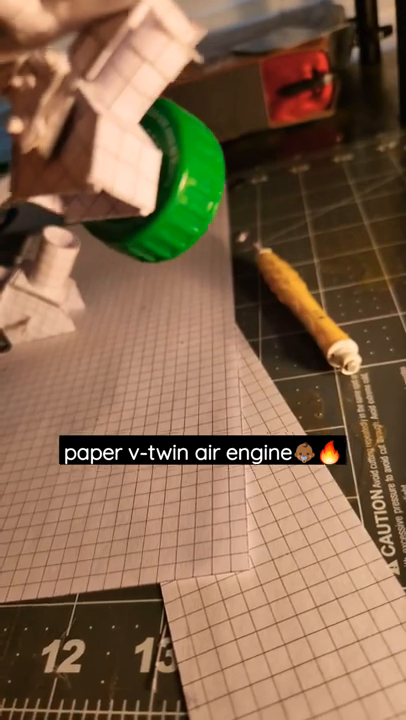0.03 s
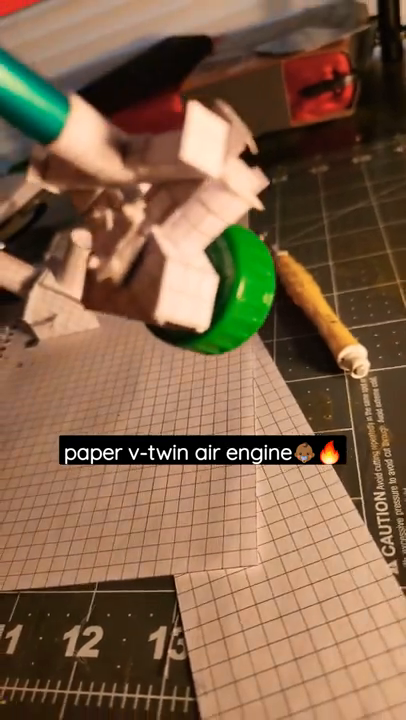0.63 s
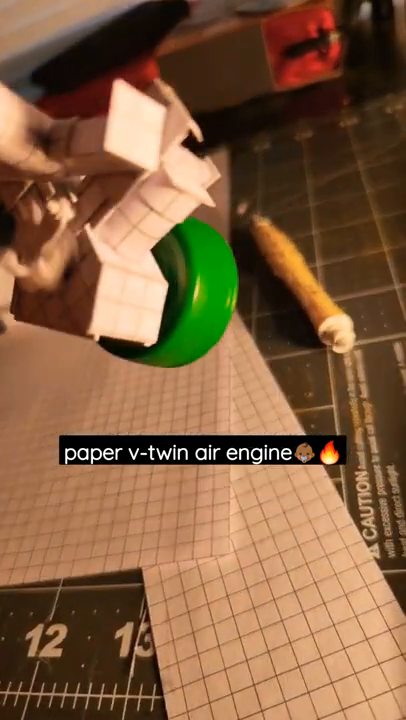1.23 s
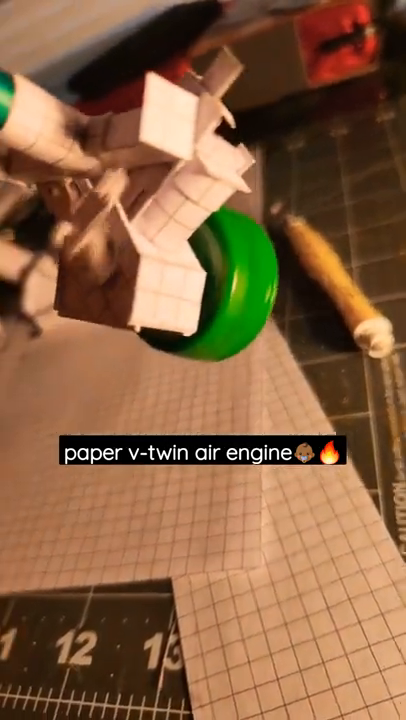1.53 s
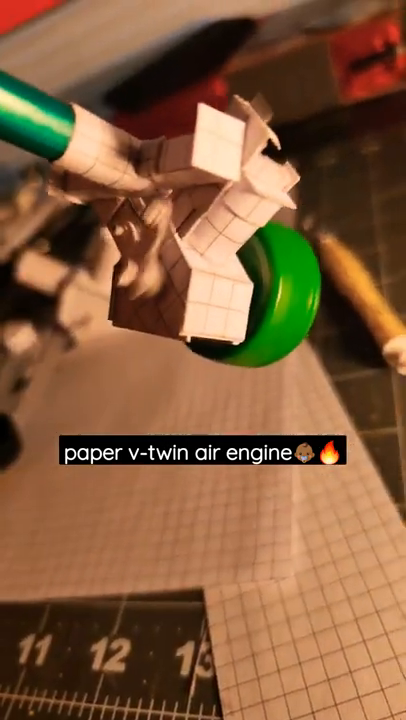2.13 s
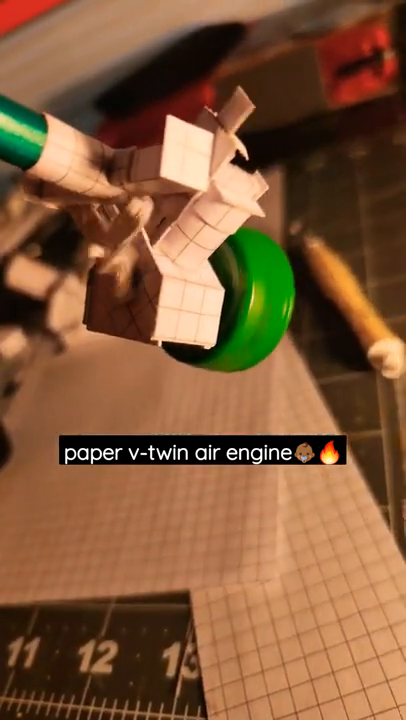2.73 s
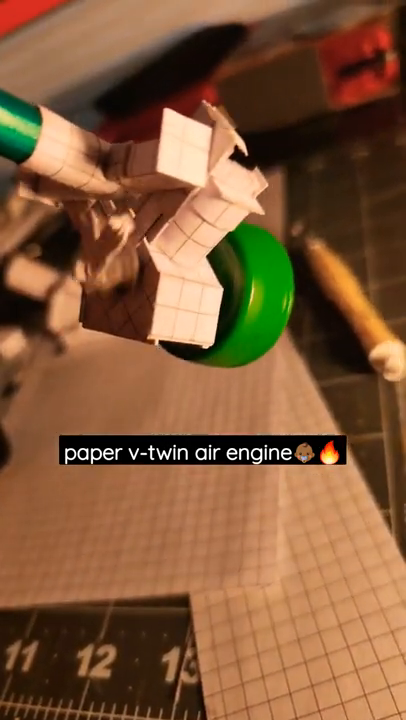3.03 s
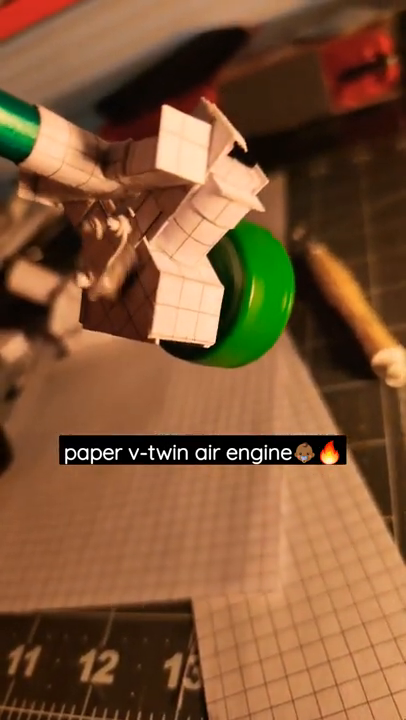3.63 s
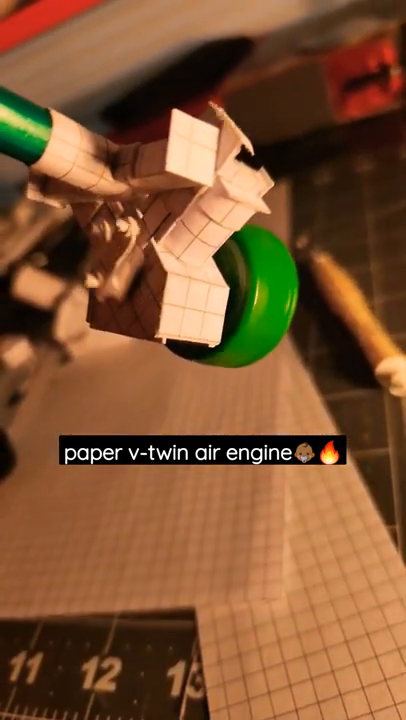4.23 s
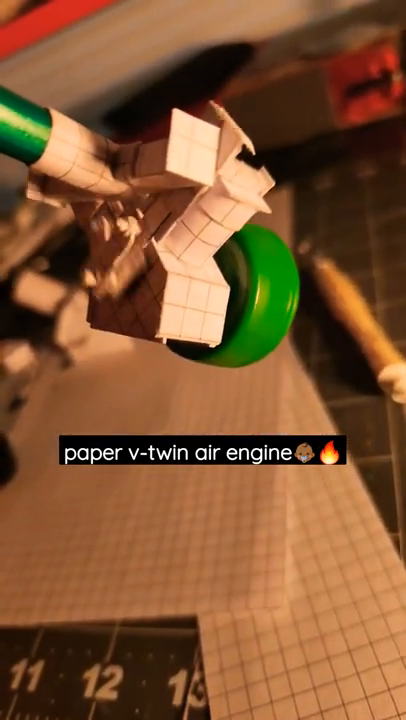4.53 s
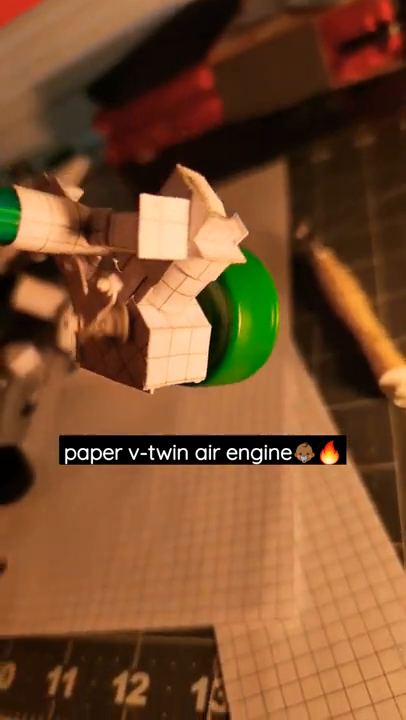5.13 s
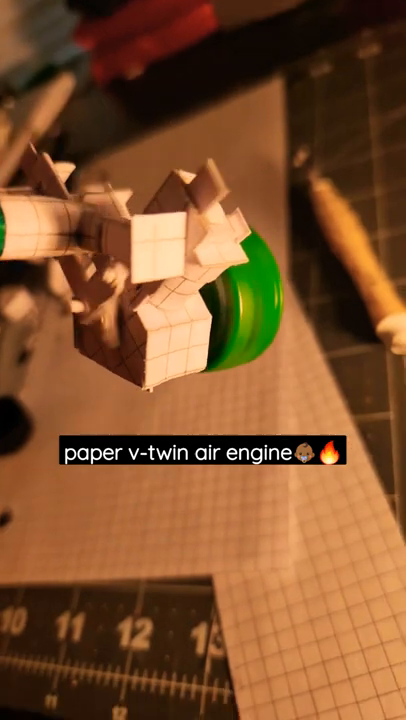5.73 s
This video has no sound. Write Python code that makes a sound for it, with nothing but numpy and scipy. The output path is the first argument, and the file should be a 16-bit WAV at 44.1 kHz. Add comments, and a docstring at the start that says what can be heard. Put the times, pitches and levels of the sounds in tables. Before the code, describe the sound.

After light handling, air hisses through a little paper engine that races with rapid clacks and a whirr, then settles.

```python
"""At a desk, close to a phone: a paper V-twin with a plastic flywheel runs on air from a tube.
The model is handled, the air comes on, the crank spins up to 32 turns/s and settles at 20 as the
pressure sags. Each turn the slack linkage clacks and thuds, the valves chop the escaping air and
the paper pistons scrape. The crank purrs and whirrs; the room rumbles and hums underneath.
Near the end the model is tipped and its treble shifts."""
import sys
import numpy as np
from scipy import signal
from scipy.fft import rfft, irfft, next_fast_len
from scipy.io import wavfile
from scipy.ndimage import uniform_filter1d

SR = 44100
rng = np.random.default_rng(int(sys.argv[2]) if len(sys.argv) > 2 else 0)


def dump_mix(stems):
    """Bounce the given channels to the path in sys.argv[1] as a 16-bit WAV at rate SR."""
    frames = np.atleast_2d(stems).T  # one column per channel
    limited = np.clip(frames, -1, 1)  # hard clip at full scale
    pcm = np.round(limited * 32767).astype(np.int16)
    wavfile.write(sys.argv[1], SR, pcm)


N = 258867
T = np.arange(N) / SR
FFT_SIZE = next_fast_len(N + SR)
HZ = np.arange(FFT_SIZE // 2 + 1) * SR / FFT_SIZE + 1e-3
AIR_ON_S = .77

# rod knocks per turn: angle/turns, clack/dB, thud/dB, clack scatter/turns
ROD_KNOCKS = [(0, 8, 2.5, .002), (.37, 5, -9, .008), (.6, -3, -14, .03), (.8, -2, -14, .04)]
# hardest clacks, at dead centre: t/s, level/dB
ROD_SLAMS = [(0.881, -27), (1.0114, -13.5), (1.0779, -17), (1.1292, -7), (1.1741, -12), (1.2127, -6.5),
             (1.249, -5), (1.3499, -8), (1.4114, -11), (1.5357, -13), (1.7215, -10.5), (1.7526, -11.5),
             (1.8153, -12), (1.9425, -14), (2.0392, -15), (2.239, -14.5), (2.273, -11), (2.3418, -9.5),
             (2.377, -11.5), (2.4123, -14), (2.4479, -15.5), (2.4829, -14.5), (2.5192, -17), (2.593, -16),
             (2.6298, -12), (2.7436, -16), (2.7827, -13), (2.8196, -15.5), (2.939, -18), (3.062, -16),
             (3.1044, -16.5), (3.1455, -14), (3.19, -15), (3.276, -15), (3.365, -19), (3.41, -16),
             (3.4558, -20), (3.5464, -18), (3.6893, -16), (3.738, -17), (3.786, -16.5), (3.9354, -18),
             (3.9853, -18), (4.034, -24), (4.0852, -24), (4.185, -18.5), (4.2846, -19.5), (4.3868, -18),
             (4.437, -18), (4.538, -17), (4.6884, -18), (4.789, -20), (4.8885, -18), (4.9396, -19),
             (4.99, -19), (5.1922, -20), (5.2441, -21), (5.2944, -18), (5.4993, -20.5), (5.6513, -20),
             (5.8045, -20)]
# paper crankcase: f/Hz, width/Hz, level/dB
CASE_MODES = [(845, 130, -7), (1066, 28, -2), (1540, 130, -1), (2900, 174, 21), (3170, 160, 11),
              (4070, 250, 7.5), (5500, 370, 6.5), (7200, 320, -15)]
# whole model on its mount: f/Hz, width/Hz, level/dB
MOUNT_MODES = [(87, 30, -9), (305, 7.4, 9.5), (338, 22, 7.5), (395, 39, 1.5), (477.5, 16, 6),
               (509.7, 4.6, -6), (702, 43, 1), (863, 10.4, 2), (1085, 32, 0)]
# valve outflow over a turn: angle/turns, level/dB
VALVE_FLOW = [(.03, 4.5), (.13, 4), (.18, 2.2), (.29, 1.5), (.37, 6), (.46, 3.5), (.6, 5), (.68, 4),
              (.8, 4.5), (.92, 4.5)]
# escaping air: f/Hz, level/dB
JET_SPECTRUM = [(300, -13.5), (620, -18), (800, -12), (1200, -11), (1450, -8.5), (1850, -9.5), (2300, -2.5),
                (2850, 0.5), (3350, 2.5), (3820, -11), (4250, -4.5), (5200, -5.5), (6300, -2.5),
                (6850, -11), (7400, -3.5), (9000, -9.5), (15000, -15.5)]
# a valve cracks open: angle/turns, level/dB
VALVE_PUFFS = [(.115, 4), (.53, 0), (.73, -2), (.9, 0)]
# those puffs: f/Hz, level/dB
PUFF_SPECTRUM = [(1000, -20), (3000, 6.5), (6500, 9.5), (7450, 18), (8600, -16), (15000, -21)]
# paper cylinders: f/Hz, width/Hz, level/dB
BORE_MODES = [(2910, 200, 6.5), (3110, 180, 2), (3250, 74, 4.5), (4090, 350, 4.5), (4290, 210, -10),
              (5480, 350, -12), (7580, 260, -2), (7460, 150, -42)]
# crank unbalance: multiple of turn rate, level/dB
SWAY_ORDERS = [(1, -9), (2, -14), (3, 2.5), (4, -8), (5, -7)]
# crankshaft at speed: multiple of turn rate, level/dB
WHIRR_ORDERS = [(9, -60), (10, -53), (11, -48), (12, -49), (13, -52), (14, -55.5), (15, -54), (16, -52),
                (17, -56), (18, -56), (19, -60), (20, -57), (21, -57.5), (22, -56.5), (28, -58)]
# crankcase hits its mount: t/s, level/dB
CASE_KICKS = [(1.007, -27), (1.128, -34), (1.41, -22), (1.441, -20)]
# hollow ring of kicks and piston drag: f/Hz, width/Hz, level/dB
HOLLOW_MODES = [(733, 36, -1), (870, 97, 6), (1060, 70, 5.5), (1420, 160, 4.5), (1620, 120, -29)]
# model bumped: t/s, level/dB, decay/s, relative case ring/dB
HANDLING_BUMPS = [(0.27, -41.5, 0.003, -30), (0.304, -55.5, 0.0089, -1), (.339, -60, .007, -4),
                  (0.356, -55.5, 0.0068, -15), (.712, -62, .012, -20), (0.737, -42.5, 0.011, -14),
                  (0.759, -40.5, 0.0048, -20), (.772, -42, 0.004, -11)]
# paper snaps: t/s, level/dB
PAPER_SNAPS = [(.269, -43), (.304, -49), (.7345, -50), (0.7458, -36), (0.756, -34)]
# model tipped: t/s, share of tipped response
TIP_SHARE = [(4.7, 0), (5.05, 0.7)]
# jets swung towards the far port: f/Hz, gain/dB
TIP_RESPONSE = [(1300, 2), (1700, 4), (2300, 4), (2900, -6), (3400, -9.5), (4100, -1.5), (4600, 5.5),
                (5100, 2.5), (6000, -4), (9500, 1), (14000, -1.5)]
# far microphone port, shaded by the phone: f/Hz, gain/dB
FAR_PORT_RESPONSE = [(100, -6.5), (380, 0), (700, -7), (1200, -5.5), (1500, -4), (2700, -6.5),
                     (3300, -10.5), (4200, -8), (5800, -10), (7400, -10), (8400, -5), (9500, -11),
                     (12000, -1), (15000, -8)]
# room rumble: f/Hz, level/dB
ROOM_SPECTRUM = [(15, -57), (25, -31), (56, 1), (88, -9), (103, -3), (125, -4.5), (146, -21), (181, -25.5),
                 (202, -22.5), (240, -15), (330, -15), (450, -34), (655, -33.5), (952, -44), (1960, -49),
                 (15000, -106)]
# steady background hiss: f/Hz, width/Hz, level/dB
HISS_BANDS = [(1900, 760, 16), (4960, 700, 2), (7360, 570, 0)]


def crank(spin_up_s=.36, fast_rps=33.94, steady_rps=19.773, slowing_s=(.97, 4.292)):
    """Speed and angle: the flywheel spins up against its inertia, then slows to a steady run."""
    spun_up = 1 - np.exp(-(np.maximum(T - AIR_ON_S, 0) / spin_up_s) ** 2)
    slowed = .5 - .5 * np.cos(np.pi * np.interp(T, slowing_s, [0, 1]))
    speed_rps = spun_up * (fast_rps + slowed * (steady_rps - fast_rps))
    turns = np.cumsum(speed_rps) / SR
    # slams fall on whole turns
    slam_s = np.transpose(ROD_SLAMS)[0]
    at_slam = np.interp(slam_s, T, turns)
    whole = np.cumsum(np.round(np.diff(at_slam, prepend=at_slam[0])))
    return speed_rps, turns - np.interp(T, slam_s, at_slam - whole) + 1


def supply_db(steady_db, surge_db, power, peak_s=1.23, sag_s=1.626):
    """Air-driven level: rises as the supply opens, sags with the pressure."""
    opening = np.clip((T - AIR_ON_S) / (peak_s - AIR_ON_S), 1e-5, 1)
    surge = np.exp(-np.maximum(T - peak_s, 0) / sag_s)
    return steady_db + surge_db * surge + power * 20 * np.log10(opening)


def linkage(speed_rps, turns, force_db, full_clack_rps=18, rattle_db=5, thud_lead_s=.0012):
    """Slack rods knock at set crank angles: a clack in the paper, a thud in the mount."""
    at_turns, clack_db, thud_db, slack_turns = np.transpose(ROD_KNOCKS)
    count = int(turns[-1]) + 1
    jitter, clack_spread, thud_spread = rng.standard_normal((count, 3, len(at_turns))).swapaxes(0, 1)
    knock_turns = np.arange(count)[:, None] + at_turns
    clack_s = np.interp(knock_turns + slack_turns * jitter, turns, T, left=0, right=N / SR)
    clacks = undb(7 + .75 * np.interp(clack_s, T, force_db) + clack_db + 2 * clack_spread)
    clacks *= np.minimum(np.interp(clack_s, T, speed_rps) / full_clack_rps, 1)
    # column 0 is dead centre: the rod rattles near one speed, and slams
    rattle = speed_band(speed_rps, centre_rps=26.1, width_rps=5.5)
    clacks[:, 0] *= undb(rattle_db * np.interp(clack_s[:, 0], T, rattle))
    slam_s, slam_db = np.transpose(ROD_SLAMS)
    slammed = np.clip(np.round(np.interp(slam_s, T, turns)).astype(int), 0, count - 1)
    clack_s[slammed, 0], clacks[slammed, 0] = slam_s, undb(slam_db + 2)
    clack = paper_clack(impulses(clack_s.ravel(), clacks.ravel()))
    # thuds keep strict time and give way to the whirr
    thud_s = np.interp(knock_turns, turns, T, right=N / SR + 1) - thud_lead_s
    thuds = impulses(thud_s.ravel(), undb(thud_db + thud_spread).ravel())
    thud = unit(ring(thuds / np.sqrt(np.maximum(speed_rps, 10)), MOUNT_MODES))
    return clack + thud * undb(force_db + 2 - 15 * whirr_share(speed_rps))


def paper_clack(hits, crunch_db=-22, crunch_s=.00079, mix_spread_db=1.6):
    """Struck paper buckles with a brief crunch; each blow rings its own mix of modes."""
    crunch = signal.lfilter([1], [1, -np.exp(-1 / (crunch_s * SR))], hits) * rng.standard_normal(N)
    drive = hits + undb(crunch_db) * crunch
    clack = sum(ring(drive * undb(mix_spread_db * wander(40)), [mode]) for mode in CASE_MODES)
    return clack / impulse_peak(CASE_MODES)


def cylinder(speed_rps, turns, air_db, force_db, full_rps=33, unseal_rps=34.5, flutter_db=1.45):
    """Air hisses, spits and puffs through the valve; the loaded piston scrapes its paper bore."""
    opening = undb(np.interp(turns, *np.transpose(VALVE_FLOW), period=1))
    reached_rps = np.maximum.accumulate(speed_rps)
    spun_up = np.minimum(reached_rps / full_rps, 1)
    # the valve seals until speed shakes it loose; slow chuffs swell as pressure builds
    sealed, seal_turns = np.maximum(1 - reached_rps / unseal_rps, 0), .19
    choke_db = 15 * sealed * crank_window(turns, seal_turns, width_turns=.1, power=4)
    choke_db += 3 * (1 - spun_up) * ((seal_turns - turns) % 1 - .5)
    jet = rng.standard_normal(N) + undb(-18) * grains(per_s=2200, spread_db=11)
    hiss = unit(colour(jet, JET_SPECTRUM))
    scrape = unit(ring(grains(per_s=900, spread_db=3), BORE_MODES))
    # before spin-up, backed-up air squeezes past the valve
    leak = np.sqrt(1 - spun_up) * unit(resonate(rng.standard_normal(N), hz=7450, width_hz=800))
    puff_gate = sum(undb(db) * crank_window(turns, at, width_turns=.029) for at, db in VALVE_PUFFS)
    puffs = spun_up * puff_gate * unit(colour(rng.standard_normal(N), PUFF_SPECTRUM))
    air = undb(air_db) * (opening * (undb(3) * hiss + undb(1) * leak) + 2 * puffs)
    return undb(flutter_db * wander(150) - choke_db) * (air + opening * undb(force_db + 7) * scrape)


def sway(turns, force_db, waver_db=.5):
    """Flywheel and pistons rock the model: a low purr locked to the crank."""
    purr = sum(undb(db + waver_db * wander(22.1)) * np.cos(2 * np.pi * order * turns)
               for order, db in SWAY_ORDERS)
    return unit(purr) * undb(force_db + 1)


def whirr(speed_rps, turns, waver_db=1.2, push_turns=.05, sing_order=27, sing_db=-55):
    """At speed the shoves of each turn merge into a rough whirr; one overtone sings as it slows."""
    hum = 0
    for order, db in WHIRR_ORDERS:
        gain = undb(db + waver_db * wander(30))
        phase_rad = .8 * rng.standard_normal() + .15 * wander(25)
        hum += gain * np.cos(2 * np.pi * order * (turns - push_turns) + phase_rad)
    sing = speed_band(speed_rps, centre_rps=27.5, width_rps=5) * undb(sing_db + waver_db * wander(12))
    return whirr_share(speed_rps) * hum + sing * np.sin(2 * np.pi * sing_order * turns)


def whirr_share(speed_rps):
    """How far the thuds have merged into a whirr, 0 to 1."""
    return speed_band(speed_rps, centre_rps=31.5, width_rps=7.5)


def piston_drag(speed_rps, turns, force_db):
    """The piston drags just before dead centre: a hollow rasp, stronger at speed."""
    rasp = unit(ring(grains(per_s=1300, spread_db=2), HOLLOW_MODES))
    stroke = crank_window(turns, at_turns=.925, width_turns=.075)
    return undb(force_db - 4 + 7 * whirr_share(speed_rps)) * stroke * rasp


def bearing_buzz(turns, level_db=-39, peak_s=1.226, rise_s=.14, fall_s=.29):
    """At full pressure the shaft strains in its paper bearing; the periodic rub rings the mount."""
    rub = unit(sum(np.sin(2 * np.pi * (order * turns + rng.random())) for order in range(9, 48)))
    buzz = rub * (1 + .18 * wander(120))
    for _ in range(2):
        buzz = resonate(buzz, hz=340, width_hz=170)
    return undb(level_db) * swell(peak_s, rise_s, fall_s) * (T > AIR_ON_S) * unit(buzz)


def kicks():
    """At full pressure the crankcase kicks its mount: hollow knocks."""
    kick_s, kick_db = np.transpose(CASE_KICKS)
    return ring(impulses(kick_s, undb(kick_db)), HOLLOW_MODES) / impulse_peak(HOLLOW_MODES)


def handling(rise_s=.0056, thump_s=.755, thump_db=-32, snap_hz=2000, snap_width_hz=900):
    """The model is shifted before it runs: scuffs, paper snaps, one dull thump."""
    rub = rng.standard_normal(N)
    scuff_hz_db = [(100, 12), (270, 2), (700, 7), (1100, 2), (1550, 12.5), (2400, 12),
                   (3300, -15), (14000, -26)]
    scuff = unit(colour(rub, scuff_hz_db))
    paper = unit(ring(rub, CASE_MODES))
    bumps = sum(undb(db) * (scuff + undb(paper_db) * paper) * swell(at_s, rise_s, decay_s)
                for at_s, db, decay_s, paper_db in HANDLING_BUMPS)
    thump = ring(impulses([thump_s], [1]), [(115, 40, 0), (171, 31, 0)])
    snap_s, snap_db = np.transpose(PAPER_SNAPS)
    snaps = resonate(impulses(snap_s, undb(snap_db)), snap_hz, snap_width_hz)
    snaps *= SR / (2 * np.pi * snap_width_hz)
    return bumps + undb(thump_db) * thump / np.abs(thump).max() + snaps


def mic_ports(body, jet_a, jet_b, lag_s=.00024, apart_hz=3800):
    """Near and late far port; the jets point apart, so the treble differs between ports."""
    lag = np.exp(-2j * np.pi * HZ * lag_s)
    coherence = .9 / np.hypot(1, (HZ / apart_hz) ** 1.5)
    far = shape(body, lag) + shape(jet_a, coherence * lag) + shape(jet_b, np.sqrt(1 - coherence ** 2))
    return np.array([body + jet_a, far])


def desk_scatter(x, desk_decay_s=.0045, room_t60_s=.22, low_hz=600, high_hz=2500, drift_hz=4):
    """Direct sound plus desk and small-room scatter, shifting as the hand-held phone drifts."""
    desk = np.exp(-T / desk_decay_s) * (T > .001)
    room = undb(-60 * T / room_t60_s) * (T > .006)
    tail = (undb(-6) * unit(desk) + undb(-13) * unit(room)) / np.sqrt(N)
    # long waves pass the clutter; treble is absorbed
    band = HZ / np.hypot(HZ, low_hz) * high_hz / np.hypot(HZ, high_hz)
    shares = np.array([wander(drift_hz) for _ in range(4)])
    shares /= np.linalg.norm(shares, axis=0)
    return x + sum(share * shape(x, rfft(tail * rng.standard_normal((2, N)), FFT_SIZE) * band)
                   for share in shares)


def tipping(x, near_share=.53):
    """The tipped model swings its jets towards the far port, recolouring the treble."""
    share = np.interp(T, *np.transpose(TIP_SHARE)) * np.array([[near_share], [1]])
    return x + share * (colour(x, TIP_RESPONSE) - x)


def room_tone(hum_hz=120, hum_db=-57, drone_hz=54.8, drone_db=-58, stereo_above_hz=700):
    """Rumble, mains hum and a wavering drone; the bass is alike in both ports."""
    mid, side = (unit(colour(rng.standard_normal(N), ROOM_SPECTRUM)) for _ in range(2))
    side = shape(side, np.minimum(HZ / stereo_above_hz + .053, 1))
    hum = undb(hum_db) * np.sin(2 * np.pi * hum_hz * T)
    drone = undb(drone_db + 3.1 * wander(5.7)) * np.sin(2 * np.pi * drone_hz * T + wander(4.6))
    return undb(-53.5) * np.array([mid + side, mid - side]) + hum + drone


def faint_hiss(level_db=-78):
    """Steady noise in three broad bands."""
    return undb(level_db) * unit(ring(rng.standard_normal((2, N)), HISS_BANDS))


def undb(db):
    """dB to gain."""
    return 10 ** (np.asarray(db) / 20)


def unit(x):
    """Scale to rms 1."""
    return x / np.sqrt(np.mean(x ** 2))


def shape(x, response):
    """Filter by a response over HZ."""
    return irfft(rfft(x, FFT_SIZE) * response, FFT_SIZE)[..., :N]


def colour(x, points):
    """Filter by (f/Hz, gain/dB) points, joined in log frequency."""
    hz, db = np.transpose(points)
    return shape(x, undb(np.interp(np.log(HZ), np.log(hz), db)))


def ring(x, modes):
    """Drive damped modes (f/Hz, width/Hz, level/dB)."""
    return shape(x, sum(undb(db) / (1 + 1j * (HZ ** 2 - hz ** 2) / (HZ * width_hz))
                        for hz, width_hz, db in modes))


def resonate(x, hz, width_hz):
    """Drive one mode."""
    return ring(x, [(hz, width_hz, 0)])


def impulses(times_s, sizes):
    """One impulse per blow."""
    return np.bincount(np.clip(np.asarray(times_s) * SR, 0, N).astype(int), sizes, N + 1)[:N]


def impulse_peak(modes):
    """Peak response to a unit blow."""
    return np.abs(ring(impulses([0], [1]), modes)).max()


def wander(rate_hz):
    """Smooth random drift, spread near 1."""
    step = int(SR / rate_hz)
    return uniform_filter1d(np.repeat(rng.standard_normal(N // step + 1), step), step)[:N]


def grains(per_s, spread_db):
    """Random clicks of unequal size."""
    present = rng.random(N) < per_s / SR
    clicks = present * rng.standard_normal(N)
    return unit(clicks * undb(spread_db * np.minimum(rng.exponential(size=N), 3)))


def swell(peak_s, rise_s, fall_s):
    """Exponential rise and fall."""
    return np.exp(-np.maximum((peak_s - T) / rise_s, (T - peak_s) / fall_s))


def crank_window(turns, at_turns, width_turns, power=2):
    """Window once per turn."""
    return np.exp(-np.abs(((turns - at_turns + .5) % 1 - .5) / width_turns) ** power)


def speed_band(speed_rps, centre_rps, width_rps):
    """Bell curve over crank speed."""
    return np.exp(-((speed_rps - centre_rps) / width_rps) ** 2)


def scene():
    """The engine at both microphone ports, over the room."""
    air_db = supply_db(steady_db=-45.5, surge_db=12.9, power=1)
    force_db = supply_db(steady_db=-54.5, surge_db=11.9, power=1.8)
    speed_rps, turns = crank()
    body = linkage(speed_rps, turns, force_db) + sway(turns, force_db) + whirr(speed_rps, turns)
    body += piston_drag(speed_rps, turns, force_db) + bearing_buzz(turns) + kicks() + handling()
    jets = [cylinder(speed_rps, turns, air_db, force_db) for _ in range(2)]
    near, far = tipping(desk_scatter(mic_ports(body, *jets)))
    return np.array([near, colour(far, FAR_PORT_RESPONSE)]) + faint_hiss() + room_tone()


def record(dry, cutoff_hz=15600):
    """The phone's steep low-pass."""
    return signal.sosfilt(signal.ellip(10, .1, 80, cutoff_hz, fs=SR, output="sos"), dry)


dry = scene()
out = record(dry)
dump_mix(out)
```